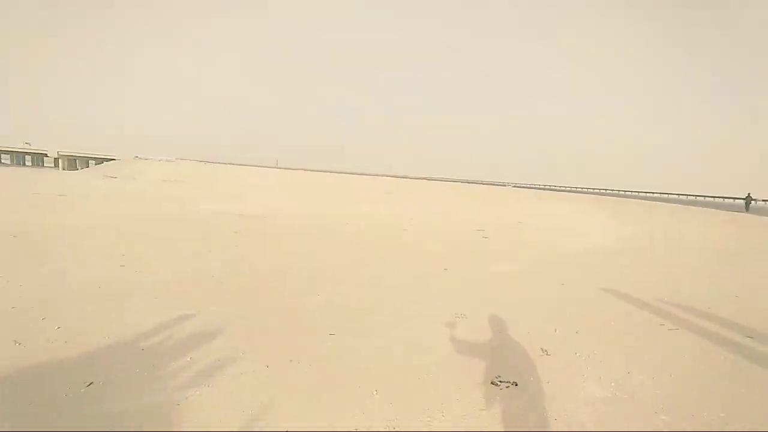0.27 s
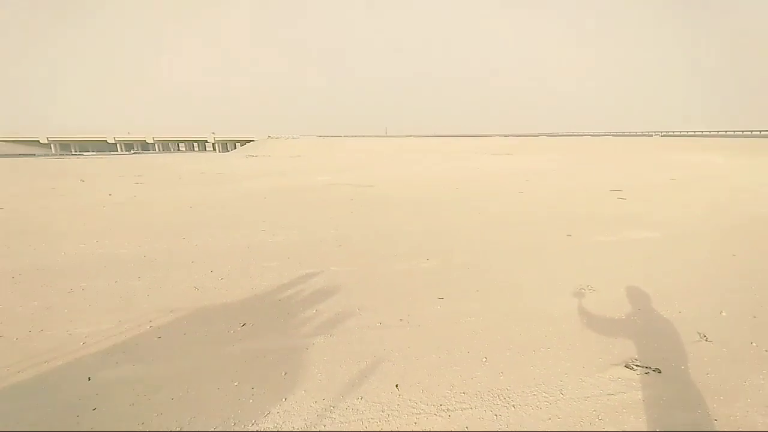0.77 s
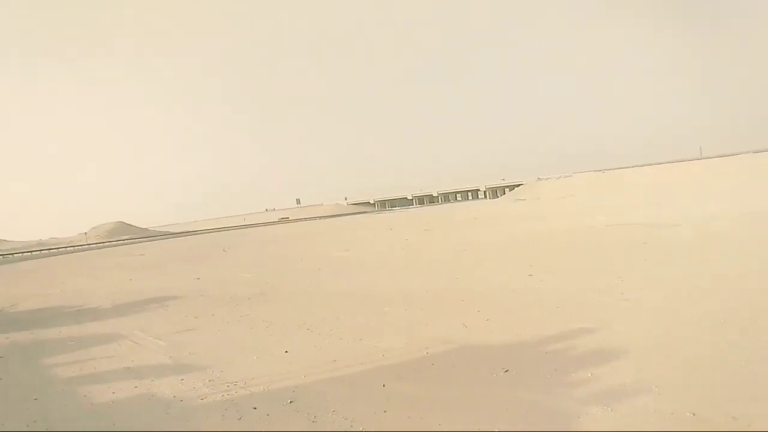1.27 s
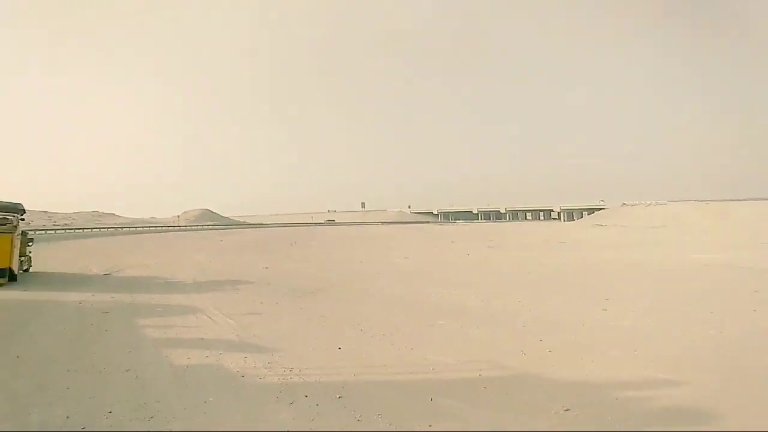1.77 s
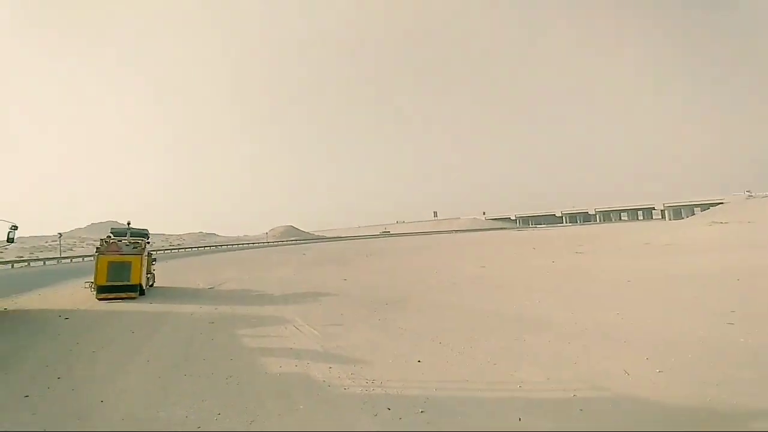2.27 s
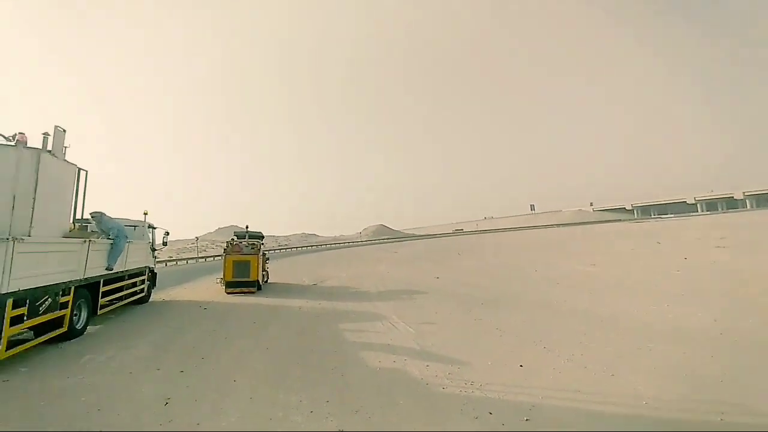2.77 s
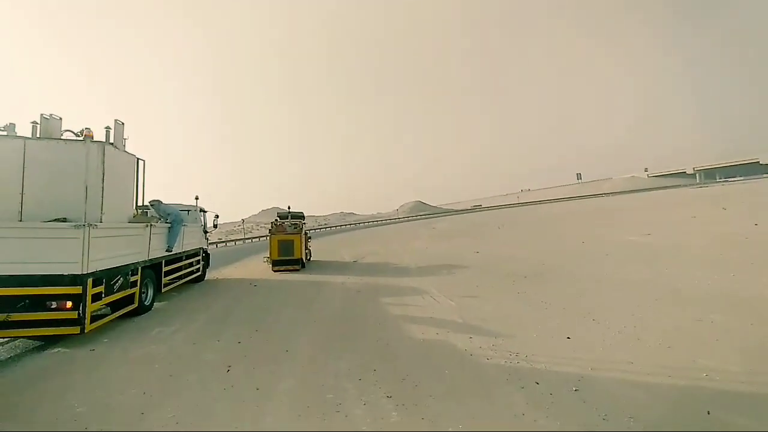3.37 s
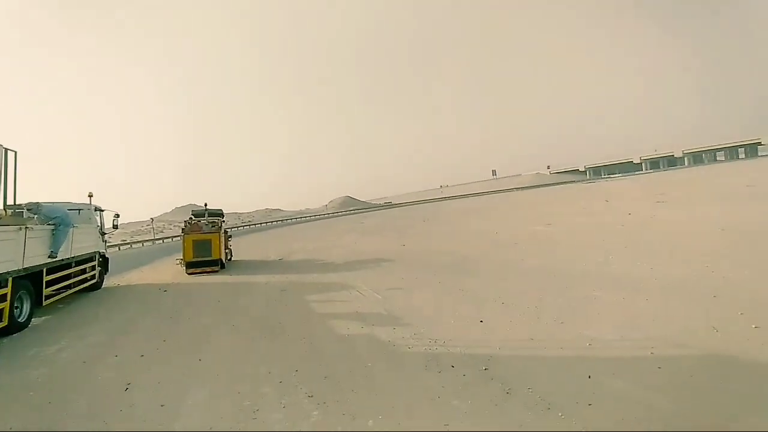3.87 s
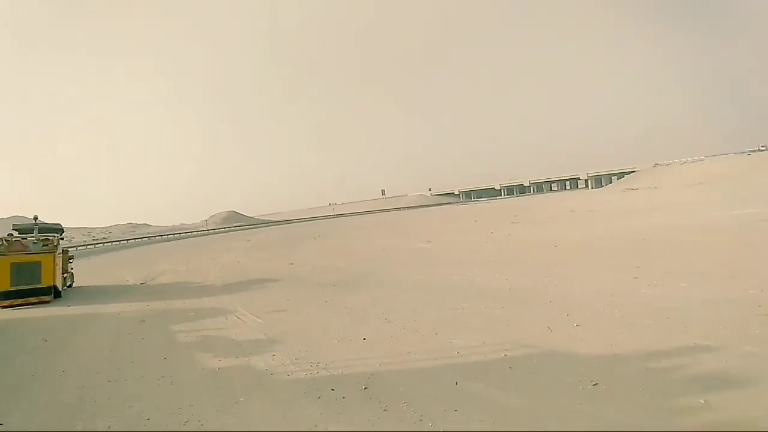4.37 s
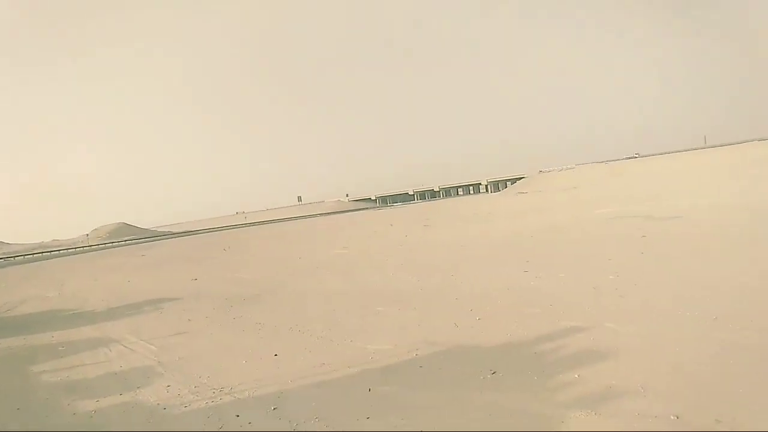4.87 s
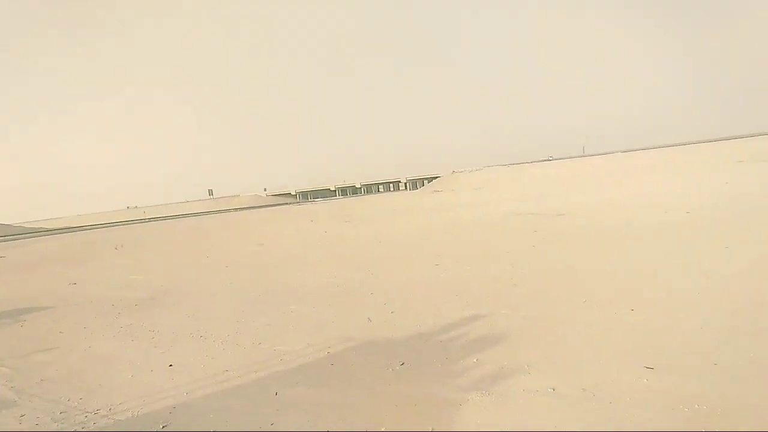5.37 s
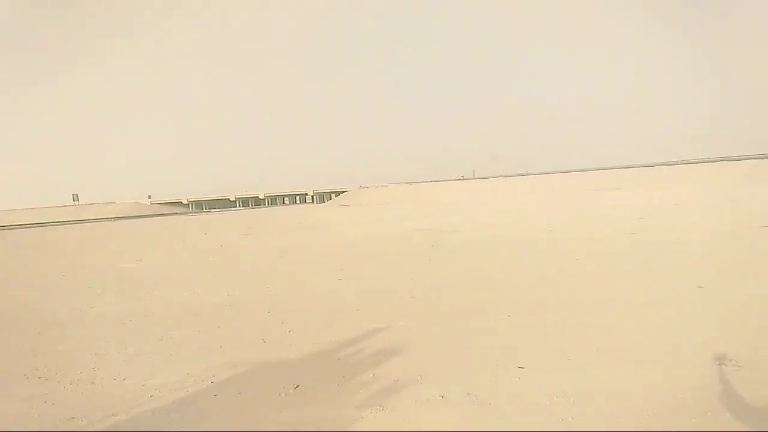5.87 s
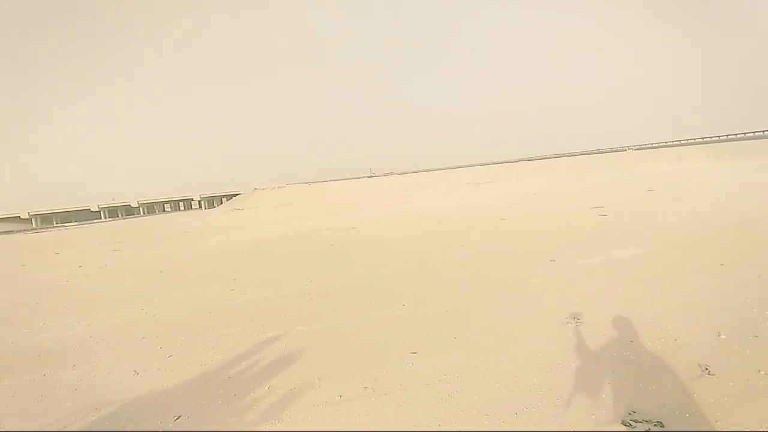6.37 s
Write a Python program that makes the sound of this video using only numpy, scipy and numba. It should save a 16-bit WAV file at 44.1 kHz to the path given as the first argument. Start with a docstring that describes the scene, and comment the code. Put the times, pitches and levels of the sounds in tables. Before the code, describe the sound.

Loud, uneven wind buffets a hand-held phone in open desert, rumbling separately in left and right and breaking into short overdriven thumps and flutters. Dry crackles snap through it, mostly on the left. A parked diesel idles faintly underneath with fast ringing knocks and clatter. The gusts thin out in the last third, where tiny whistles and a small metal squeak slip by.

```python
"""Strong wind buffets the two microphone ports of a hand-held phone in open desert.
Each port hears its own low-passed noise, brighter as the air speeds up, with short fast jets that overdrive it.
A parked diesel idles nearby: ringing knocks, rattle and clatter, late in the left port by a lag that varies.
Dry crackles, a few short whistles, a far rap and a metal squeak come in between."""
import sys
import numpy as np
from scipy import signal
from scipy.fft import rfft, irfft
from scipy.io import wavfile
from scipy.ndimage import map_coordinates
from numba import njit

SR = 44100
rng = np.random.default_rng(int(sys.argv[2]) if len(sys.argv) > 2 else 0)


def store_wav(level_fs):
    """Save 16-bit WAV to argv[1]."""
    pcm = np.round(np.clip(np.atleast_2d(level_fs), -1, 1) * 32767)
    wavfile.write(sys.argv[1], SR, pcm.T.astype(np.int16))


def natural_amplitude(level_db):
    """Convert a level in decibels to a linear amplitude factor, elementwise."""
    exponent = np.asarray(level_db, float) / 20
    return 10 ** exponent


N = 292383


def rms_one(x):
    """Scales to rms 1."""
    return x / np.sqrt(np.mean(x ** 2) + 1e-20)


def in_time(rows):
    """Columns of a table against its first, time in seconds: one value per sample."""
    s, *columns = np.transpose(rows)
    return [np.interp(np.arange(N) / SR, s, column) for column in columns]


def drift(rate_hz):
    """Random wander of rms 1: noise through two equal poles at rate_hz."""
    settle = 20000
    r = np.exp(-2 * np.pi * rate_hz / SR)
    wander = signal.lfilter([1], [1, -2 * r, r * r], rng.standard_normal(N + settle))
    return rms_one(wander[settle:])


def butter_noise(order, hz, kind):
    """White noise through a Butterworth filter."""
    return signal.sosfilt(signal.butter(order, hz, kind, fs=SR, output="sos"), rng.standard_normal(N))


def ring(clicks, hz, t60_s):
    """A two-pole resonance: a unit click starts a decaying sine of height 1."""
    r, w = natural_amplitude(-60 / (t60_s * SR)), 2 * np.pi * hz / SR
    return signal.lfilter([0, np.sin(w)], [1, -2 * r * np.cos(w), r * r], clicks + 1e-18)


# Engine clatter spectrum. Each row: frequency in Hz, relative density in dB per Hz.
CLATTER_SPECTRUM = [(300, 5), (1000, 8), (1700, 5.5), (2100, -3), (2550, -3.5), (2950, -7.5), (3500, -11),
                    (4600, -10.5), (6000, -17), (7400, -23), (8400, -30.5), (10500, -43.5), (16000, -54.5)]
# Engine panel modes. Each row: frequency in Hz, relative level in dB, t60 in seconds.
PANEL_MODES = [(1943, -2, .16), (1963, -8, .12), (1960, 10, .011), (2101, -12, .2), (2398, -14, .2),
               (3212, -24, .16), (3331, -22, .16), (3946, -24, .16), (5151, -21, .12)]


def engine():
    """Every firing knocks the panels, leaves them rattling for a moment and swells the clatter."""
    firing_hz, first_swell_s, swell_s = 19.84, .040, .034
    rattle_db, new_rattle = -21, .8   # new_rattle: weight of fresh noise beside the repeating noise
    hz = np.fft.rfftfreq(N, 1 / SR) + 1
    spectrum_hz, spectrum_db = np.transpose(CLATTER_SPECTRUM)
    colour = natural_amplitude(np.interp(np.log(hz), np.log(spectrum_hz), spectrum_db))
    white = rng.standard_normal((3, N))
    near, spread_left, spread_right = [rms_one(irfft(rfft(w) * colour, N)) for w in white]

    since_s = (np.arange(N) / SR - first_swell_s) % (1 / firing_hz)
    swell = np.sin(np.pi * np.clip(since_s / swell_s, 0, 1)) ** 2
    near = near * (1 + 0.4 * swell)
    knock_at = np.flatnonzero(np.diff(since_s) < 0) + int(swell_s * SR / 4)
    for mode_hz, db, t60_s in PANEL_MODES:
        level = natural_amplitude(db + rattle_db + 0.5 * drift(6.7))
        repeating = rng.standard_normal(N)[(since_s * SR).astype(int)]
        blows = level * swell * (repeating + new_rattle * rng.standard_normal(N))
        blows[knock_at] += natural_amplitude(db - 5 + rng.normal(0, 2, len(knock_at)))
        near += ring(blows, mode_hz, t60_s)
    return near, np.array([spread_left, spread_right])


# A short far rap: start in seconds, low edge in Hz, high edge in Hz, starting level in dB, t60 in seconds.
FAR_RAP = (4.296, 2200, 3700, -39, .12)


def rap():
    """A brief puff of mid-treble noise that dies at once."""
    start_s, low_hz, high_hz, db, t60_s = FAR_RAP
    t = np.arange(N) / SR - start_s
    noise = rms_one(butter_noise(2, [low_hz, high_hz], "band"))
    return (t > 0) * natural_amplitude(db - 60 * np.maximum(t, 0) / t60_s) * noise


# A metal squeak: start in seconds, length in seconds, frequency in Hz, level in dB.
METAL_SQUEAK = (5.5305, .017, 7225, -36.5)
# Ticks around the squeak. Each row: time in seconds, level in dB before filtering.
RUB_TICKS = [(5.5225, -20), (5.532, -24), (5.5535, -19)]


def squeak():
    """A short rub holds one high mode, then lets it ring out; hiss and ticks go with it."""
    start_s, length_s, hz, db = METAL_SQUEAK
    rub_db = -49   # hiss before filtering
    t = np.arange(N) / SR - start_s
    ringing_db = np.where(t > length_s, -9 - 1500 * (t - length_s), 0)
    tone = (t > 0) * natural_amplitude(db + ringing_db) * np.sin(2 * np.pi * hz * t + .4 * drift(60))
    rub = natural_amplitude(rub_db) * (np.abs(t - length_s / 2) < length_s) * rng.standard_normal(N)
    for s, tick_db in RUB_TICKS:
        rub[int(s * SR)] = natural_amplitude(tick_db)
    high_pass = signal.butter(2, 1800, "high", fs=SR, output="sos")
    hiss = signal.sosfilt(high_pass, rub + .12 * ring(rub, hz, .012))
    return signal.sosfilt(signal.cheby2(8, 40, 9000, fs=SR, output="sos"), tone + hiss)


# The clearest dry crackles. Each row: start in seconds, port, burst peak in dB before the low-pass.
CLEAR_CRACKLES = [(0.684, "left", -23), (0.878, "left", -30), (0.981, "left", -19.5),
                  (1.024, "left", -18.5), (1.1521, "left", -21.5), (1.318, "right", -19),
                  (1.362, "left", -18.5), (1.583, "left", -26.5), (1.64, "left", -29.5),
                  (1.7624, "left", -22), (1.8368, "left", -27), (2.1057, "left", -20.5),
                  (2.366, "right", -23), (2.6627, "left", -15), (2.9653, "left", -19),
                  (3.232, "right", -20), (3.2665, "right", -28), (4.0383, "left", -13.5),
                  (4.221, "left", -21), (4.2574, "left", -27.5), (4.4086, "left", -21.5),
                  (5.205, "left", -34.5), (5.2756, "left", -24), (5.4914, "left", -34.5),
                  (5.6, "left", -20), (6.5035, "left", -22)]


def crackles():
    """Each is a few sharp steps within a millisecond; faint ones fall at random."""
    faint_count, faint_min_db, faint_range_db = 9, -40.5, 10.0
    leak_db, decay_s, length = -25, .00025, 140   # leak to the other port; length in samples
    out = np.zeros((2, N + length))
    faint = []
    for when, side, size in rng.random((faint_count, 3)):
        port = "left" if side < .7 else "right"
        faint.append((when * N / SR, port, faint_min_db + faint_range_db * size))
    for s, port, db in CLEAR_CRACKLES + faint:
        at = int(s * SR)
        burst = rng.standard_normal(length) ** 3 * np.exp(-np.arange(length) / (decay_s * SR))
        heard_db = db + leak_db * np.array([[port != "left"], [port != "right"]])
        out[:, at:at + length] += natural_amplitude(heard_db) * burst / np.abs(burst).max()
    return signal.lfilter([1], [1, -.88], out[:, :N])


# Left-port whistles. Each row: middle in seconds, frequency in Hz, glide in Hz per s, level in dB before flicker.
EDGE_WHISTLES = [(5.26, 1760, -8000, -32), (5.29, 1480, -6000, -36), (5.313, 1500, 7000, -32),
                 (5.381, 1560, -9000, -36), (5.548, 1230, 2000, -36)]


def whistles():
    """The stream over the port edge briefly locks on a sliding pitch; phase and level waver."""
    t, out, waver_rad = np.arange(N) / SR, np.zeros(N), .8 * drift(70)
    for s, hz, glide_hz_per_s, db in EDGE_WHISTLES:
        since = t - s
        phase = 2 * np.pi * (hz + glide_hz_per_s * since / 2) * since + waver_rad
        out += natural_amplitude(db - 7.0 * (since / 0.0096) ** 2) * np.sin(phase)
    return out * natural_amplitude(4.0 * drift(90))


@njit
def four_poles(x, share):
    """Four one-pole low-passes in a row with a moving corner."""
    out, state = np.empty_like(x), np.zeros(4)
    for i in range(len(x)):
        v = x[i]
        for k in range(4):
            state[k] += share[i] * (v - state[k])
            v = state[k]
        out[i] = v
    return out


def smooth_above(x, corner_hz):
    """Eddies smaller than the port average out: a low-pass whose corner follows the air speed."""
    return four_poles(x, 1 - np.exp(-2 * np.pi * np.clip(corner_hz, 30, 12000) / SR))


def eddies(speed_db, low_hz, knee_hz, corner_hz, level_db, follows, lumpy_db):
    """Turbulence on one port; each lump of faster air is both louder and brighter."""
    big = butter_noise(1, [low_hz, knee_hz], "band")
    lumps_db = lumpy_db * (0.077 * drift(1.6) + 0.49 * drift(11.0) + 0.47 * drift(80))
    pressure = smooth_above(big, corner_hz * natural_amplitude(speed_db + lumps_db))
    broken_db = 2.18 * drift(14.1)   # level alone, not brightness
    return rms_one(pressure) * natural_amplitude(level_db + follows * speed_db + 0.63 * lumps_db + broken_db)


# The strongest jets of air. Each row: middle in seconds, port, strength in dB.
STRONG_JETS = [(0.19, "right", -11.5), (0.243, "left", 2.5), (0.263, "left", -4), (0.527, "left", -9.5),
               (0.554, "left", -8.5), (0.669, "right", -6), (0.718, "right", -1), (0.808, "right", -4.5),
               (1.01, "right", -9.5), (1.04, "right", -10.5), (1.049, "left", -8.5), (1.065, "right", -8),
               (1.081, "right", -6), (1.205, "right", -5), (1.208, "left", -10), (1.228, "left", -6.5),
               (1.279, "left", -7.5), (1.292, "right", -6), (1.318, "left", -4.5), (1.336, "right", -11.5),
               (1.366, "left", -3), (1.395, "left", -4.5), (1.408, "left", -2.5), (1.449, "left", -3.5),
               (1.524, "left", -5.5), (1.544, "right", -11), (1.547, "left", 0), (1.57, "left", 1),
               (1.613, "left", -15), (1.646, "left", -10.5), (1.695, "left", -4), (1.719, "left", -4.5),
               (1.866, "right", -15.5), (1.949, "right", -11), (2.069, "left", -14.5), (2.118, "left", -1),
               (2.139, "left", 4.5), (2.147, "left", -2.5), (2.207, "left", 3.5), (2.231, "left", -5.5),
               (2.248, "left", -8.5), (2.291, "left", -7.5), (2.305, "left", -4.5), (2.335, "left", -10.5),
               (2.35, "right", -13.5), (2.368, "left", -4.5), (2.405, "left", -2.5), (2.439, "left", -4.5),
               (2.439, "right", -8.5), (2.457, "left", -3.5), (2.657, "left", -7.5), (2.68, "left", -5),
               (2.756, "left", -3.5), (2.787, "left", -3), (2.801, "right", -2), (2.827, "left", -11),
               (2.982, "left", -1.5), (3.004, "left", -1), (3.024, "left", -1), (3.06, "right", -5),
               (3.082, "left", -9), (3.084, "right", -11), (3.1, "right", -11.5), (3.106, "left", -10),
               (3.117, "right", -5.5), (3.159, "left", -16), (3.17, "right", -8), (3.186, "left", -5),
               (3.205, "right", -5.5), (3.216, "left", -3.5), (3.28, "right", -12.5),
               (3.282, "left", -10.5), (3.302, "right", -1), (3.31, "right", 2.5), (3.332, "left", -11),
               (3.346, "right", -12), (3.354, "right", -15), (3.371, "left", -7.5), (3.387, "right", -10),
               (3.4, "right", 6), (3.415, "left", -4.5), (3.457, "right", -8), (3.475, "left", -4),
               (3.508, "right", -13.5), (3.541, "left", -10), (3.572, "left", 4), (3.591, "right", -10.5),
               (3.608, "left", -6.5), (3.726, "left", -3), (3.778, "left", -1.5), (3.853, "left", -6.5),
               (3.874, "left", -0.5), (3.892, "left", -5), (4.009, "right", -14), (4.075, "right", -4.5),
               (4.187, "right", -8), (4.265, "left", -8), (4.29, "left", -9), (4.332, "right", -4.5),
               (4.797, "right", -12), (4.953, "right", -16), (5.22, "right", -7), (5.249, "right", -12),
               (5.268, "right", -10), (5.327, "left", -12.5), (5.418, "right", -10), (5.7, "right", -12.5),
               (6.103, "left", -16)]


def jets(port, speed_db):
    """A jet swells and fades in a few ms; a stronger jet is faster, so its flutter reaches higher."""
    rise_s, fall_s = 0.0039, 0.0052   # strength is 6 dB down this far from the middle
    # weak jets by chance: rate and strength at mean speed, growth in dB per dB of speed
    weak_per_s, weak_db, weak_follows, weak_spread_db = 10, -20.5, 1.2, 3.5
    growth_db = weak_follows * speed_db
    born = rng.random(N) < weak_per_s * natural_amplitude(growth_db) / SR
    middles = born * natural_amplitude(weak_db + growth_db + weak_spread_db * rng.standard_normal(N))
    for s, side, db in STRONG_JETS:
        middles[int(s * SR)] += (side == port) * natural_amplitude(db)

    t = np.arange(-3000, 3001) / SR
    swell = natural_amplitude(-6 * np.abs(t / np.where(t < 0, rise_s, fall_s)) ** 1.26)
    strength = 1e-4 + np.abs(signal.fftconvolve(middles, swell, "same"))
    strength = strength * natural_amplitude(3.34 * drift(330))
    speed = strength ** 0.37
    flutter = smooth_above(butter_noise(1, 110, "high"), 1400 * speed)
    return natural_amplitude(7.0) * strength ** 0.26 * smooth_above(flutter, 3400 * speed)


def membrane(wind):
    """Big swings stop at the end of the membrane's travel; pressure bleeds off slowly, so flat tops sag."""
    travel, drive_db = .86, 2.5   # travel: full scale is 1
    swing = natural_amplitude(drive_db) * wind / travel
    held = travel * swing / (1 + np.abs(swing) ** 6.0) ** (1 / 6.0)
    return signal.sosfilt(signal.butter(1, [7, 3600], "band", fs=SR, output="sos"), held)


# Ports, left then right. Each row: lowest frequency in Hz, big-eddy knee in Hz, small-eddy corner in Hz
# at mean speed, pressure in dB at mean speed, pressure in dB per dB of speed, lumpiness in dB.
PORT_EDDIES = [(9, 93.7, 469, -11, 1, 3.5), (18, 180, 458, -17.5, 2.5, 4)]
# Air speed over each port. Each row: time in seconds, speed in dB about the mean.
LEFT_AIR_SPEED = [(0.0, 0.9), (0.24, -1), (0.4, -3.5), (0.48, -0.1), (0.72, 3), (0.8, -2.5), (1.04, 0.5),
                  (1.52, 1.5), (2.0, -4.5), (2.16, 6), (2.56, -3), (2.72, 2.5), (3.84, 2), (4.0, 0),
                  (4.8, -4), (4.96, -2.5), (5.04, -6), (5.28, 1.4), (5.76, -5), (6.08, 0.5), (6.4, -2.5),
                  (6.62, 0.1)]
RIGHT_AIR_SPEED = [(0.0, -2.5), (0.08, -3), (0.16, 0.3), (0.4, -1.5), (0.64, 3.5), (0.96, -0.4),
                   (1.04, 2.5), (1.68, 0.5), (1.76, 1), (2.08, -1), (2.16, 1.6), (2.32, 0.2), (2.4, 4),
                   (2.56, -0.74), (3.44, 2.5), (4.32, 0), (4.48, -1.5), (4.8, 1), (6.08, 1), (6.16, 0),
                   (6.48, -1), (6.62, 1)]
# The phone turns. Each row: time in seconds, left lag in ms, direct engine gain in dB, scattered level in dB.
PHONE_TURN = [(0, 0.32, -43.5, -43), (1.0, .5, -50, -46.5), (1.7, 0.47, -48, -46.5),
              (2.2, 0.39, -49.5, -46), (3.0, 0.27, -47, -47), (3.4, .26, -53, -44), (3.8, 0.34, -48, -45.5),
              (4.3, 0.44, -45, -48), (5.0, .51, -44, -49), (5.7, 0.51, -44, -49), (6.63, .44, -45, -46)]


def scene():
    """Wind is separate in each port; engine and rap are shared, late in the left; scatter differs per port."""
    lag_ms, engine_db, scattered_db = in_time(PHONE_TURN)
    near, spread = engine()
    far = natural_amplitude(engine_db) * near + rap()
    late = map_coordinates(far, [np.arange(N) - lag_ms * SR / 1000], order=3)
    shared = np.array([late, far]) + squeak()

    (left_db,), (right_db,) = in_time(LEFT_AIR_SPEED), in_time(RIGHT_AIR_SPEED)
    left = membrane(eddies(left_db, *PORT_EDDIES[0]) + jets("left", left_db)) + whistles()
    right = membrane(eddies(right_db, *PORT_EDDIES[1]) + jets("right", right_db))
    return np.array([left, right]) + shared + natural_amplitude(scattered_db) * spread + crackles()


def top_cut(x):
    """Nothing passes above the cut-off."""
    return signal.sosfilt(signal.butter(12, 15800, fs=SR, output="sos"), x)


def record(dry):
    """The converter stops at full scale; the last 2 ms fade out."""
    fade = np.minimum(np.arange(N)[::-1] / (.002 * SR), 1)
    return top_cut(np.clip(dry, -1, 1) * fade)


dry = scene()
out = record(dry)
store_wav(out)
```